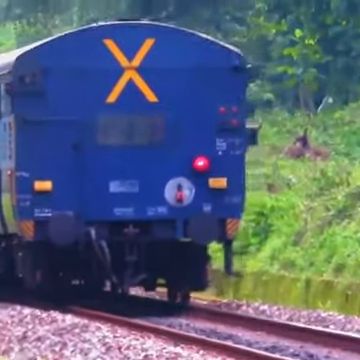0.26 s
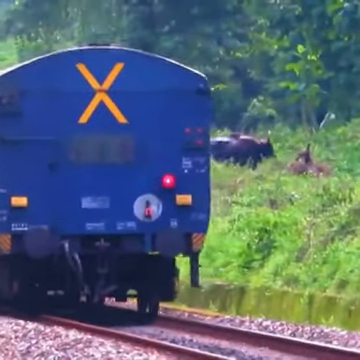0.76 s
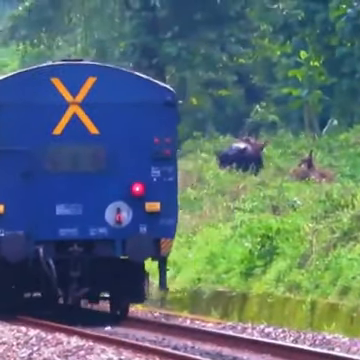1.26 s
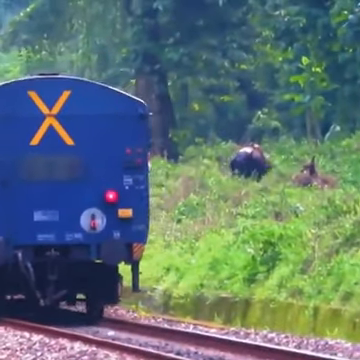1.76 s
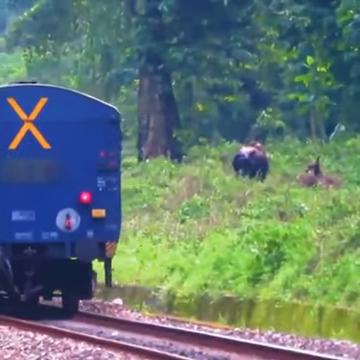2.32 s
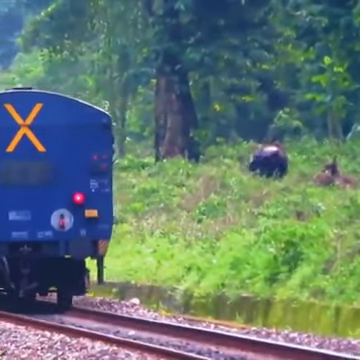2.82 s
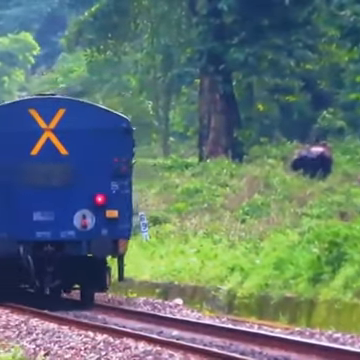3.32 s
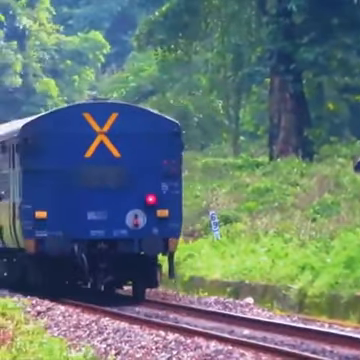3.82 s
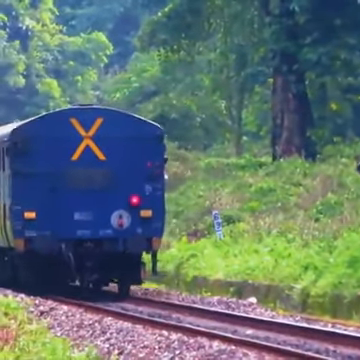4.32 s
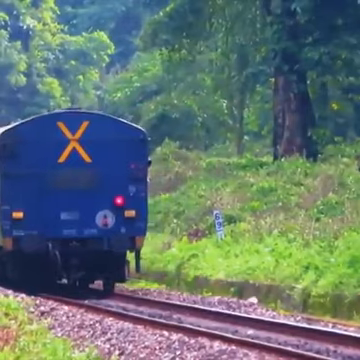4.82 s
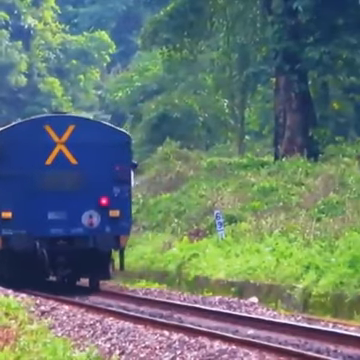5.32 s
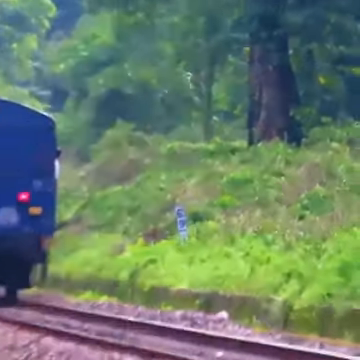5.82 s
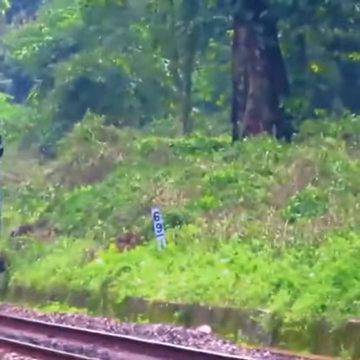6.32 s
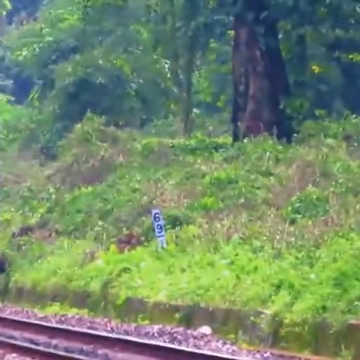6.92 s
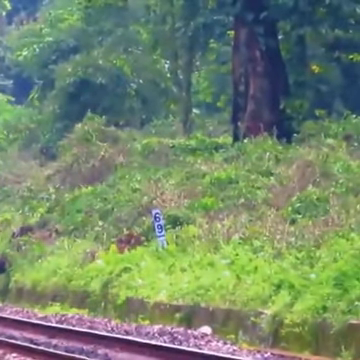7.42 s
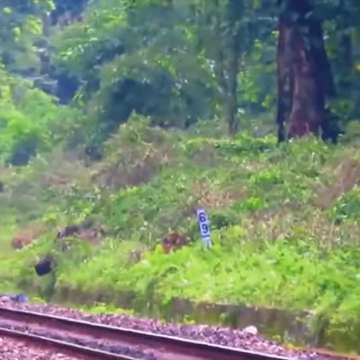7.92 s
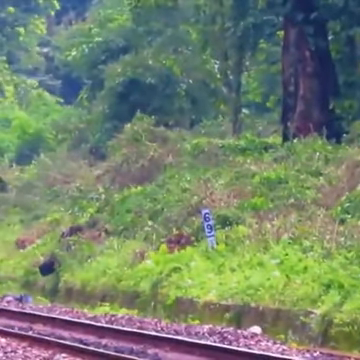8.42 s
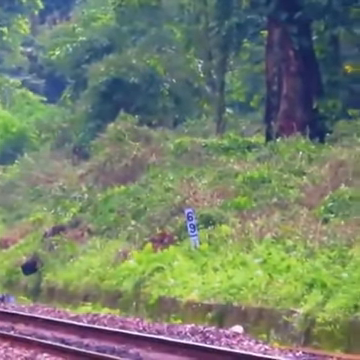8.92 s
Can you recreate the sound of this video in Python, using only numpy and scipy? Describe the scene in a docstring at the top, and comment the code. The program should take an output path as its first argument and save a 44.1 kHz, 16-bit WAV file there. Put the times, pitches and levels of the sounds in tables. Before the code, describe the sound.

Shrill cicadas ring and buzz in wide stereo over a faint wash of forest air. Small birds call clearly above them: a rapid descending-note trill, piercing slurs and warbling whistles, then an evenly spaced harsh rattle. Low far hoots and rough croaks come and go, with brief insect rasps. The chorus thins late, almost drops away, then returns strongly. The microphone stands outdoors among trees, the bird calls doubled by a tight echo.

```python
"""A shrill insect chorus in a forest: click trains and noise, coloured by voice, sink briefly and swell again.
Small birds trill, chirp and rattle over it: warbling glides with weak overtones, some with noise rasp.
Katydid rasps are band-passed noise, far croaks sliding rough resonances, far hoots smeared sagging tones.
A faint wash of shaped noise is the forest air. The calls arrive with a hard, close echo."""
import sys
import numpy as np
from scipy import signal
from scipy.fft import rfft, irfft
from scipy.io import wavfile
from scipy.ndimage import map_coordinates

SR = 44100
rng = np.random.default_rng(int(sys.argv[2]) if len(sys.argv) > 2 else 0)


def to_wav(s):
    """Save 16-bit WAV."""
    ch = np.atleast_2d(s).T  # columns
    pcm = np.round(np.clip(ch, -1, 1) * 32767)  # PCM
    wavfile.write(sys.argv[1], SR, pcm.astype(np.int16))


N = 403956
TRUNK_DELAY_S = .0142


def from_db(db):
    """Amplitude ratio of a level in dB."""
    return 10 ** (np.asarray(db) / 20)


def rms_one(x):
    """Scale to an rms of 1."""
    return x / np.sqrt(np.mean(x ** 2) + 1e-20)


def at_hz(points, hz):
    """Read a spectrum on a log-frequency axis."""
    return np.interp(np.log(hz + 1e-9), np.log(np.array(points)[:, 0]), np.array(points)[:, 1])


def in_time(rows):
    """Join the rows of a curve by straight lines."""
    s, *columns = np.transpose(rows)
    return [np.interp(np.arange(N) / SR, s, c) for c in columns]


def drift(rate_hz):
    """Smooth chance of spread 1 that turns about `rate_hz` times a second."""
    steps = np.arange(N) / SR * rate_hz
    return rms_one(map_coordinates(rng.standard_normal(4096), [steps], order=2, mode="wrap"))


def add(track, start_s, sound):
    """Mix a sound into a track."""
    i = max(round(start_s * SR), 0)
    track[i:i + len(sound)] += sound[:N - i]


def colour(pair, spectrum):
    """Spectra of a pair of signals, weighted by a gain curve."""
    hz = np.arange(N // 2 + 1) * SR / N
    return rfft(pair) * from_db(at_hz(spectrum, hz))


def spread(pair, spectrum, wider_db=0):
    """Colour two unrelated signals and use them as middle and sides; rms 1."""
    # stereo width: (frequency [Hz], side minus mid before wider_db [dB])
    side_mid = [(30, -2), (150, -8), (450, 2), (1300, 2), (2100, -0.5), (2900, -8.5), (4000, -38),
                (5500, -17.5), (7500, -10.5), (9500, -15.5), (12000, -28.5)]
    hz = np.arange(N // 2 + 1) * SR / N
    mid, side = colour(pair, spectrum)
    width = from_db(at_hz(side_mid, hz) + wider_db)
    ears = np.array([mid + width * side, mid - width * side]) / np.sqrt(1 + width ** 2)
    return rms_one(irfft(ears, N))


def echo(x, delay_s, gain):
    """The sound plus one reflection, scaled to about unchanged power."""
    late = np.pad(x, ((0, 0), (round(delay_s * SR), 0)))[:, :N]
    return (x + gain * late) / np.sqrt(1 + gain ** 2)


def tymbals(click_hz, throb_hz, throb_db, far_db, count):
    """A few near insects click in throbbing trains over the smooth blur of many far ones."""
    out = np.zeros((2, N))
    for k in range(count):
        rate_hz = click_hz * rng.uniform(.7, 1.3) * (1 + .06 * drift(40))
        clicks = np.diff(np.floor(np.cumsum(rate_hz) / SR), prepend=0)
        throb = from_db(throb_db * drift(throb_hz))
        out[k % 2] += clicks * throb * rng.choice([-1, 1], N)
    near = np.array([rms_one(side) for side in out])
    return near + from_db(far_db) * rng.standard_normal((2, N))


def soloists(swell_db=2.0):
    """Each sings through a narrow body resonance and swells in its own time."""
    # single cicadas: (centre [Hz], width of each of two passes [Hz], mean level against the chorus [dB])
    singers = [(4065, 72, -10.5), (4407, 51, -12), (5130, 27, -13.5), (5500, 28, -13.5), (6046, 39, -12.5),
               (6450, 29, -11.5)]
    out = np.zeros(N)
    for hz, width_hz, db in singers:
        b, a = signal.iirpeak(hz, hz / width_hz, fs=SR)
        song = signal.lfilter(b, a, signal.lfilter(b, a, rng.standard_normal(N)))
        out += rms_one(song) * from_db(db + swell_db * drift(3.03))
    return out


def far_chorus():
    """Distant insects blur into a wash of noise, different in each ear."""
    # far insects: (frequency [Hz], relative level per Hz [dB])
    spectrum = [(2000, -35), (2900, -9.5), (4000, 2.5), (5000, 2.5), (6300, 5), (7000, 3), (10000, -30),
                (12500, -25.5)]
    return from_db(-38.5) * rms_one(irfft(colour(rng.standard_normal((2, N)), spectrum), N))


def insects():
    """Two cicada voices and a few soloists under a shrill mass and a fine hiss."""
    # effort before the mix trims: (time [s], droning cicadas [dB], ringing cicadas [dB], shrill mass [dB])
    effort = [(0.0, -24, -24, -28.4), (0.22, -34, -33.0, -34.5), (0.7, -20.5, -27.5, -27.5),
              (1.15, -26.5, -27.5, -29.2), (1.5, -22, -26.5, -27), (1.9, -33, -26, -27.5),
              (2.7, -28.5, -25.5, -27), (3.6, -23, -25.5, -26.5), (5.1, -24.5, -26.5, -27),
              (6.7, -23.5, -28.5, -30), (7.9, -29, -31.5, -33.7), (8.85, -38.5, -34, -35),
              (8.99, -23, -26, -27.5), (9.15, -16.5, -18.5, -19.5)]
    # fine top hiss before its trim: (time [s], level [dB])
    hiss = [(0.0, -38), (0.5, -33.5), (1.1, -55), (2.4, -47.5), (5.0, -48.5), (6.6, -55.5), (7.1, -48.9),
            (7.25, -42.5), (8.3, -35.5), (9.15, -40)]
    # colour of each voice: (frequency [Hz], relative level per Hz [dB])
    drone_spectrum = [(3300, -28.5), (3780, -74), (3950, 12.5), (4120, 10.5), (4400, 10), (4650, 2),
                      (5000, -18), (6000, -42.5)]
    ringing_spectrum = [(1800, -42), (2500, -15), (3000, -7), (3600, -3.5), (4400, -5.5), (4850, 4.5),
                        (5100, 0.5), (6000, 2), (6500, 1), (6650, -31), (9000, -60)]
    shrill_spectrum = [(3000, -38), (5500, -16), (6350, -7), (6650, 3.5), (7400, 3.5), (8550, 1),
                       (8750, -9.5), (9900, -4), (10300, -18), (12000, -31), (12500, -62)]
    fine_spectrum = [(7000, -25), (9000, 0), (10300, 0), (11900, -6), (12300, -17), (15500, -32)]
    drone_trim_db, ringing_trim_db, shrill_trim_db, fine_trim_db = -6, -3, -1.55, -0.5
    dip_s, dip_sigma_s, dip_db = 8.86, .033, 11.5
    double_click_s = .00201

    drone_db, ringing_db, shrill_db = in_time(effort)
    fine_db, = in_time(hiss)
    # all but the fine hiss dips briefly
    dip = from_db(-dip_db * np.exp(-((np.arange(N) / SR - dip_s) / dip_sigma_s) ** 2 / 2))

    drone = spread(tymbals(click_hz=420.4, throb_hz=139, throb_db=1.5, far_db=-1.5, count=4), drone_spectrum)
    drone *= from_db(drone_db + drone_trim_db + 2.0 * drift(140))
    ringing = tymbals(click_hz=401.9, throb_hz=69.8, throb_db=1.0, far_db=6, count=4)
    ringing = spread(ringing, ringing_spectrum, wider_db=-6)
    ringing *= from_db(ringing_db + ringing_trim_db + 1.26 * drift(35))
    shrill = tymbals(click_hz=377.8, throb_hz=70.26, throb_db=4.5, far_db=2.5, count=6)
    shrill = spread(shrill, shrill_spectrum, wider_db=-6)
    shrill *= from_db(shrill_db + shrill_trim_db + drift(35))
    fine = spread(rng.standard_normal((2, N)), fine_spectrum, wider_db=15.5)
    fine *= from_db(fine_db + fine_trim_db + 2 * drift(60))

    # each tymbal click comes twice, which gathers the song into bands 500 Hz apart
    cicadas = echo(drone + ringing, double_click_s, .76)
    solos = from_db(ringing_db) * soloists()
    return dip * (cicadas + far_chorus() + solos) + echo(dip * shrill + fine, TRUNK_DELAY_S, 0.17)


def forest_air():
    """A steady faint wash of shaped noise."""
    # air: (frequency [Hz], relative level per Hz [dB])
    spectrum = [(20, -15), (120, -14.5), (240, -10), (330, -5.5), (480, 1.5), (700, 3), (950, -1),
                (1500, 2.5), (2100, 1.5), (3000, -0.5), (6000, -25), (15000, -33.5)]
    return from_db(-44.5) * spread(rng.standard_normal((2, N)), spectrum)


def hoots(blur=1.0):
    """Far sagging hoots, smeared differently on their way to each side."""
    # hoots: (start [s], length [s], mid pitch [Hz], level before smearing [dB])
    calls = [(-.1, 0.33, 694, -49), (2.056, 0.21, 694, -51), (2.952, .34, 754, -54.5),
             (4.301, 0.15, 689, -48.5), (4.55, 0.6, 810, -52), (5.1, 0.785, 508, -55.5),
             (6.995, 0.39, 614, -55.5), (7.801, 0.65, 642, -56)]
    sag_hz_per_s = 23.1
    out, t = np.zeros((2, N)), np.arange(N) / SR
    paths = np.array([np.exp(2j * k) + blur * (drift(25) + 1j * drift(25)) for k in range(2)])
    for s, length_s, hz, db in calls:
        on = (t > s) & (t < s + length_s)
        u = (t[on] - s) / length_s
        phase = 2 * np.pi * np.cumsum(hz - sag_hz_per_s * length_s * (u - .5)) / SR
        swell = from_db(db) * np.sqrt(np.sin(np.pi * u))
        out[:, on] += swell * np.real(paths[:, on] * np.exp(1j * phase))
    return out


def syllable(name, ratio=1, sweep=1, second_db=-30):
    """A gliding, warbling whistle with weak overtones and a slightly unsteady pitch."""
    # glide plus warble, before ratio and sweep: name: (length [s], first [Hz], last [Hz],
    # glide curve [<0 settles early, >0 moves late], warble swing [Hz], warble turns [count],
    # warble pace [<1 slows down], fade [dB], unsteadiness [0-1], third harmonic [dB])
    shapes = { "trill": (.019, 4160, 3060, -.6, 0, 0, 1, 2.5, .016, -14),
              "slur": (.068, 5900, 3530, -7.6, 0, 0, 1, 7, .011, -25),
              "rise": (.039, 2950, 3200, 2, -250, .56, 2.1, -12, .011, -21),
              "zigzag": (.056, 4900, 4650, 2, 830, 1.54, .62, 1.5, .022, -25),
              "wave": (.088, 4560, 4450, .5, -700, 3.3, 1.03, 11, .022, -25),
              "warble": (.056, 2930, 4400, 4.7, -270, 1.52, .72, -8, .014, -15),
              "tsip": (.052, 7170, 5100, -9.5, 130, 1.3, .93, 10, .008, -25),
              "tick": (.019, 6330, 5200, 2.6, -600, .92, 1.13, -4, .05, -27),
              "arch": (.125, 3150, 2550, 3, -280, 1, .7, 7, .037, -27),
              "sigh": (.062, 6900, 5600, -.5, 0, 0, 1, 2.5, .037, -27), }
    attack_s, release_s = 0.0047, 0.0034
    length_s, first_hz, last_hz, curve, swing_hz, turns, pace, fade_db, waver, third_db = shapes[name]
    t = np.arange(int(length_s * SR)) / SR
    u = t / length_s
    glide = first_hz + (last_hz - first_hz) * np.expm1(curve * u) / np.expm1(curve)
    hz = glide + swing_hz * np.cos(2 * np.pi * turns * u ** pace)
    unsteady = np.interp(u, np.linspace(0, 1, 24), rng.standard_normal(24))
    pitch = (hz.mean() + sweep * (hz - hz.mean())) * ratio * (1 + waver * unsteady)
    phase = 2 * np.pi * np.cumsum(pitch) / SR
    tone = np.sin(phase) + from_db(second_db) * np.sin(2 * phase)
    # the third harmonic vanishes at high pitch
    tone += from_db(third_db) * np.sin(3 * phase) / (1 + (pitch / 3300) ** 12)
    ramps = np.clip(np.minimum(t / attack_s, (length_s - t) / release_s), 0, 1)
    return tone * from_db(-fade_db * u) * ramps


def bird_notes():
    """Single whistled syllables from near birds."""
    # notes: (start [s], syllable name, level [dB], pitch ratio)
    notes = [(.425, "sigh", -21.5, 0.98), (3.51, "sigh", -24, 0.95), (3.695, "slur", -8.5, 1),
             (3.986, "rise", -22.5, 1), (4.049, "rise", -24, .98), (4.283, "rise", -21.5, 1),
             (4.345, "rise", -23, 1), (4.454, "zigzag", -9, 0.98), (4.571, "zigzag", -9, 0.97),
             (6.54, "arch", -32, 1), (7.001, "wave", -9.5, 0.99), (7.795, "warble", -23.5, 0.97),
             (7.895, "warble", -23.5, 0.95), (7.997, "warble", -24.5, 0.94), (8.13, "tsip", -9, 0.97)]
    out = np.zeros(N)
    for s, name, db, ratio in notes:
        add(out, s, from_db(db) * syllable(name, ratio))
    return out


def trill():
    """A long trill slows a little and fades, while its sweeps deepen and flatten in turn."""
    start_s, gap_s, slowing_s, count = .601, .04568, .00006, 23
    level_db, fade_db_per_s = -11, 1.4
    mean_sweep, sweep_swing, cycle_s, deepest_s = 0.85, 0.23, 0.356, 1.08
    out = np.zeros(N)
    for k in range(count):
        s = start_s + k * gap_s + slowing_s * k ** 2 / 2
        sweep = mean_sweep + sweep_swing * np.cos(2 * np.pi * (s - deepest_s) / cycle_s)
        db = level_db - fade_db_per_s * (s - start_s)
        add(out, s, from_db(db) * syllable("trill", sweep=sweep))
    return out


def leaves(calls, level_db=-16, t60_s=1.0):
    """Foliage scatters a short diffuse tail of the calls to either side."""
    tail = rng.standard_normal((2, SR // 2)) * from_db(-60 * np.arange(SR // 2) / SR / t60_s)
    tail /= np.sqrt(np.sum(tail ** 2, axis=1, keepdims=True))
    return calls + from_db(level_db) * signal.fftconvolve(calls[None], tail, axes=1)[:, :N]


def katydids(side_db=-15):
    """Rasps: short swells of scratchy noise in one broad resonance."""
    # rasps: (peak time [s], Gaussian sigma [s], centre [Hz], filter width [Hz], peak level [dB])
    rasps = [(1.70, 0.014, 11240, 1310, -28), (3.885, 0.032, 9300, 2790, -23.5),
             (4.195, 0.029, 9350, 2500, -23), (4.705, 0.01, 9700, 3170, -21.5),
             (6.84, 0.048, 11860, 1300, -38.5)]
    out, t = np.zeros((2, N)), np.arange(N) / SR
    mid, side = rng.standard_normal((2, N))
    noise = mid + from_db(side_db) * side * [[1], [-1]]
    for s, sigma_s, hz, width_hz, db in rasps:
        band = signal.butter(2, [hz - width_hz / 2, hz + width_hz / 2], "band", fs=SR, output="sos")
        near = abs(t - s) < 4 * sigma_s
        rasp = rms_one(signal.sosfilt(np.vstack([band, band]), noise[:, near]))
        out[:, near] += rasp * from_db(db) * np.exp(-((t[near] - s) / sigma_s) ** 2 / 2)
    return out


def croaks(side_db=-8):
    """Hoarse far calls: a rough resonance slides down over a weaker, lower one."""
    # croaks: (peak time [s], peak level [dB])
    calls = [(1.971, -36.5), (3.252, -38), (4.49, -33), (5.49, -36), (6.05, -33), (8.53, -33),
             (9.02, -30.5)]
    sigma_s, upper_hz, fall_hz_per_s, width_hz = 0.032, 2790, 14000, 620
    lower_hz, lower_db = 1655, -10.5
    out, t = np.zeros((2, N)), np.arange(N) / SR
    lowpass = signal.butter(2, width_hz / 2, fs=SR, output="sos")
    noise = rng.standard_normal((2, N)) + 1j * rng.standard_normal((2, N))
    mid, side = signal.sosfilt(lowpass, noise)
    rough = mid + from_db(side_db) * side * [[1], [-1]]
    for s, db in calls:
        near = abs(t - s) < 4 * sigma_s
        dt = t[near] - s
        upper = np.exp(2j * np.pi * (upper_hz * dt - fall_hz_per_s * dt ** 2 / 2))
        lower = from_db(lower_db) * np.exp(2j * np.pi * lower_hz * dt)
        croak = rms_one(np.real(rough[:, near] * (upper + lower)))
        out[:, near] += from_db(db) * croak * np.exp(-(dt / sigma_s) ** 2 / 2)
    return out


def rattle_note(rasp_db=-6.0, rasp_s=0.053, low_hz=5400, high_hz=8000, floor_hz=3300, top_hz=11000):
    """A harsh tick: a shaky sweep with a stronger octave, and a longer swell of rasp."""
    tone = syllable("tick", second_db=-22)
    size = max(int(rasp_s * SR), len(tone))
    throat = np.vstack([signal.butter(1, [low_hz, high_hz], "band", fs=SR, output="sos"),
                        signal.butter(2, floor_hz, "high", fs=SR, output="sos"),
                        signal.butter(1, top_hz, fs=SR, output="sos")])
    rasp = rms_one(signal.sosfilt(throat, rng.standard_normal(size)))
    swell = np.sin(np.pi * np.sqrt(np.arange(size) / size))
    return np.pad(tone, (0, size - len(tone))) + from_db(rasp_db) * rasp * swell


def rattle():
    """A scolding rattle of evenly spaced ticks, loudest in its middle."""
    start_s, gap_s, count = 7.167, .0709, 9
    first_db, swell_db = -20.5, 1.5
    out = np.zeros(N)
    for k in range(count):
        db = first_db + swell_db * np.sin(np.pi * k / count)
        add(out, start_s + k * gap_s, from_db(db) * rattle_note())
    return out


def scene():
    """Insects all round, birds close by, and far calls in the forest air."""
    birds = leaves(bird_notes() + trill() + rattle())
    far = forest_air() + hoots() + croaks() + katydids()
    return insects() + echo(birds, TRUNK_DELAY_S, 0.99) + echo(far, TRUNK_DELAY_S, 0.49)


def record(dry):
    """A steep low-pass cuts the top."""
    cutoff_hz = 15900
    return signal.sosfilt(signal.ellip(10, .1, 80, cutoff_hz, fs=SR, output="sos"), dry)


dry = scene()
out = record(dry)
to_wav(out)
```